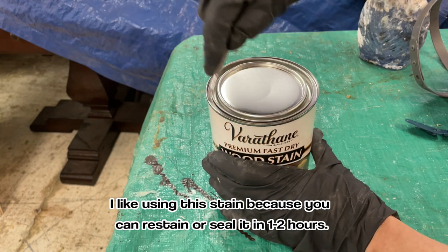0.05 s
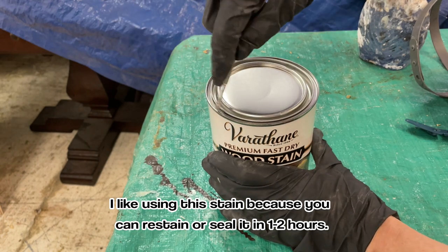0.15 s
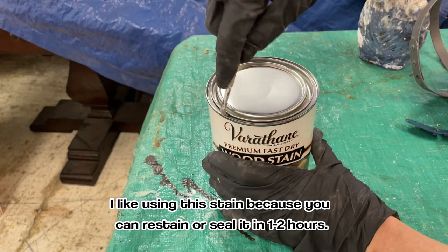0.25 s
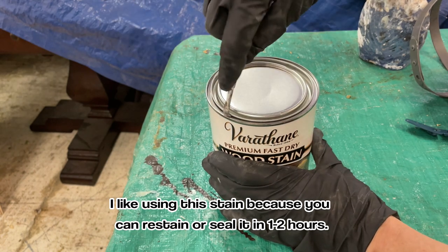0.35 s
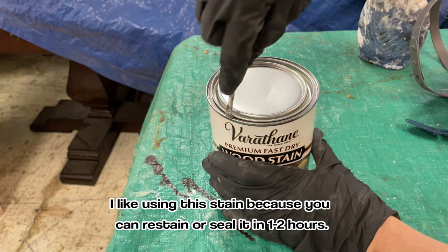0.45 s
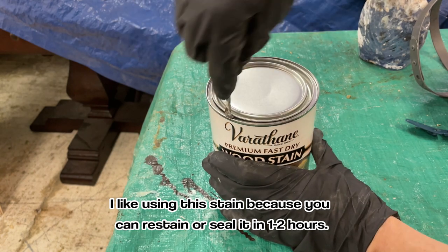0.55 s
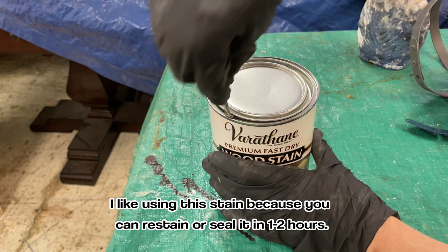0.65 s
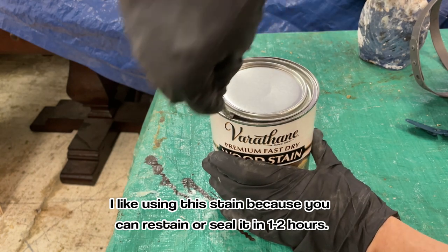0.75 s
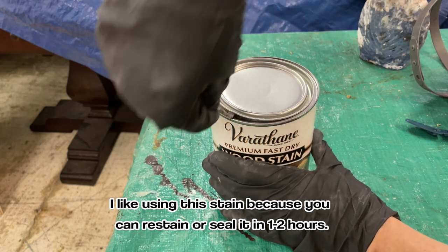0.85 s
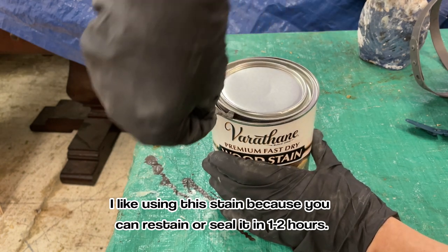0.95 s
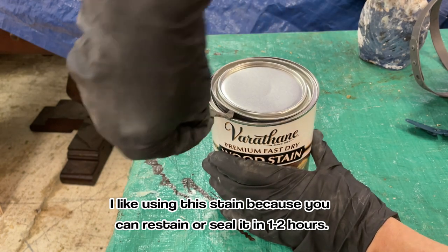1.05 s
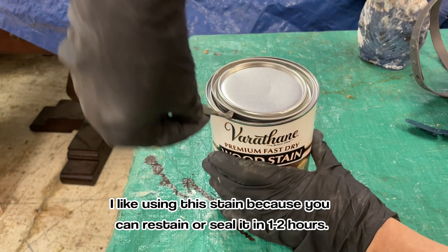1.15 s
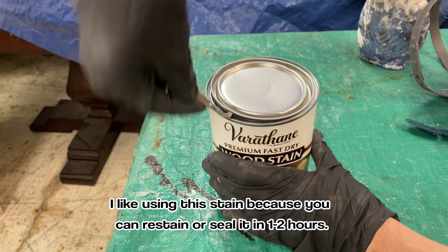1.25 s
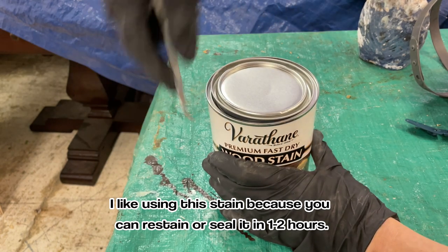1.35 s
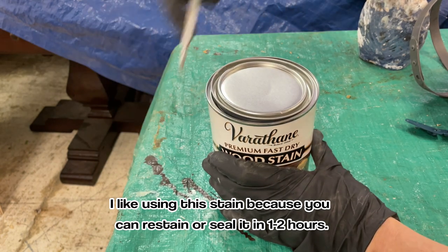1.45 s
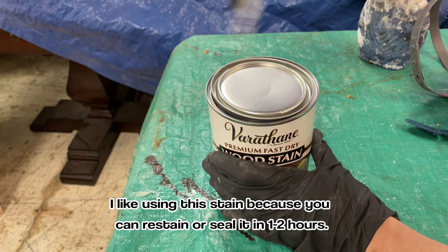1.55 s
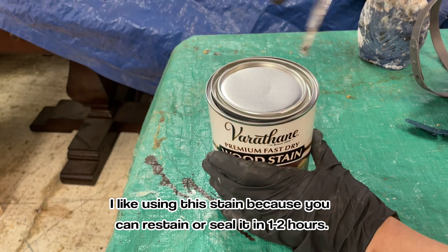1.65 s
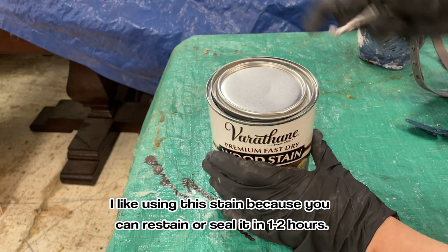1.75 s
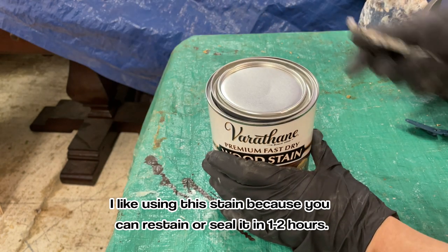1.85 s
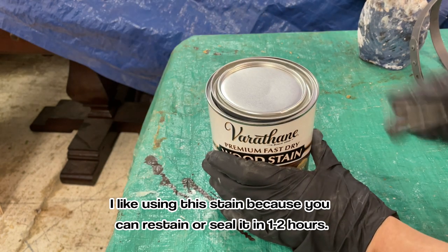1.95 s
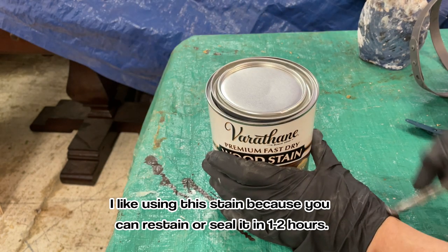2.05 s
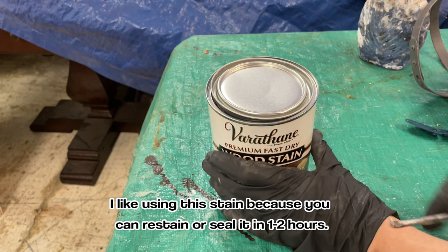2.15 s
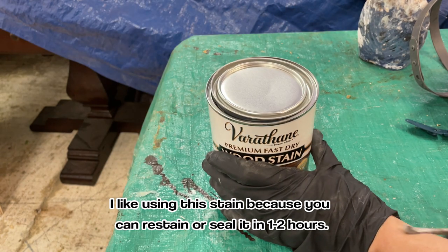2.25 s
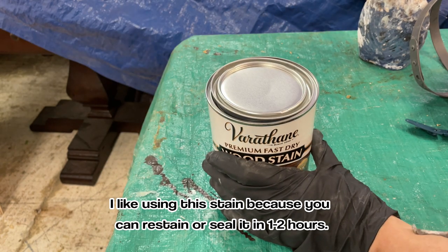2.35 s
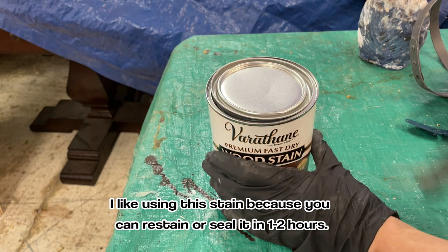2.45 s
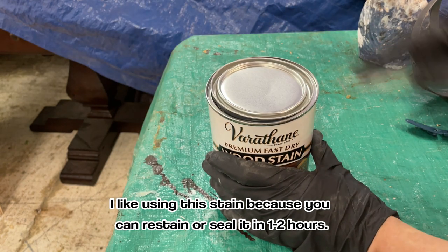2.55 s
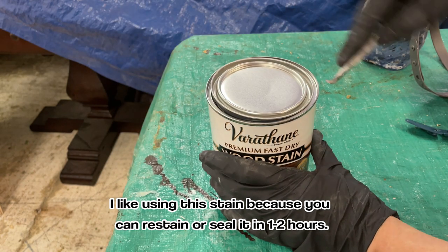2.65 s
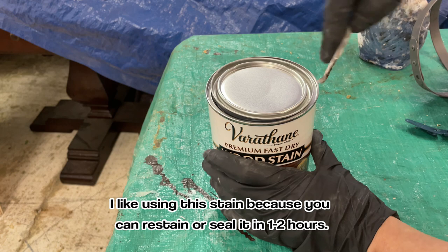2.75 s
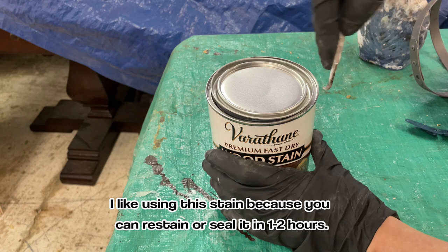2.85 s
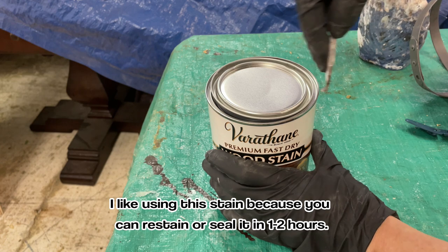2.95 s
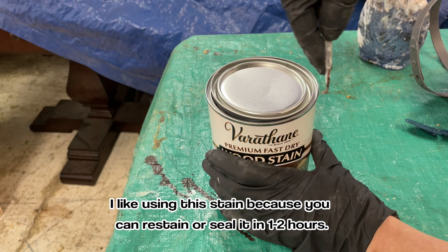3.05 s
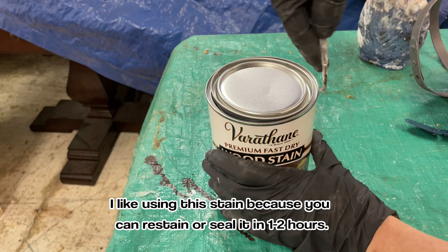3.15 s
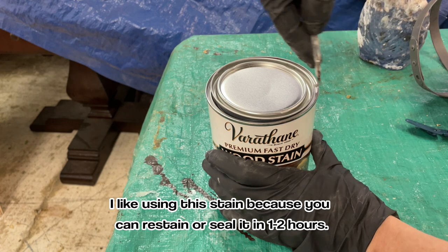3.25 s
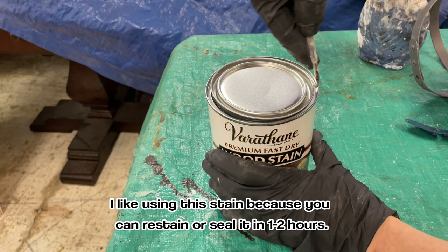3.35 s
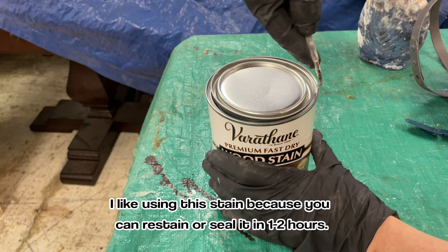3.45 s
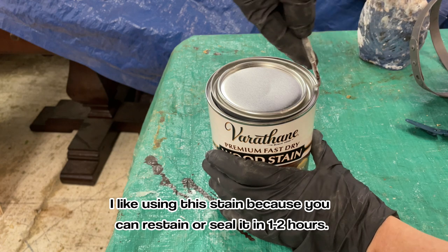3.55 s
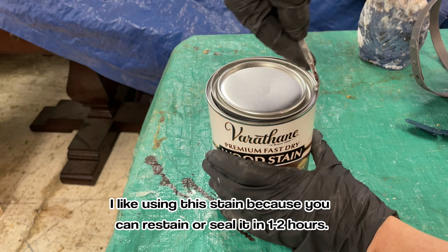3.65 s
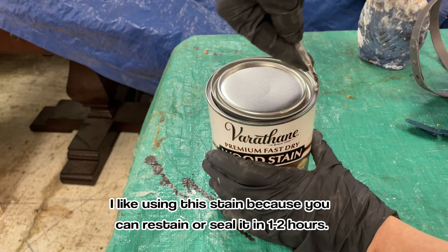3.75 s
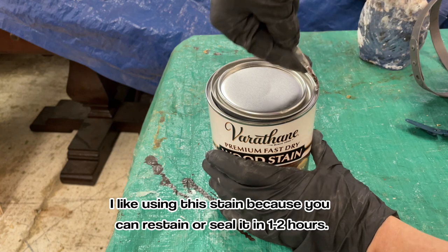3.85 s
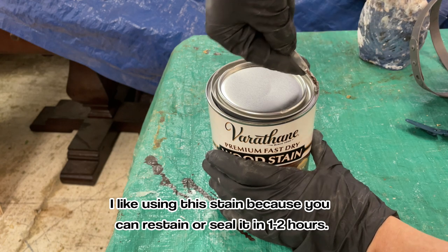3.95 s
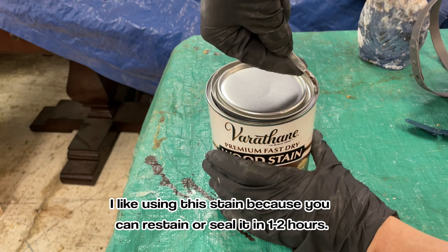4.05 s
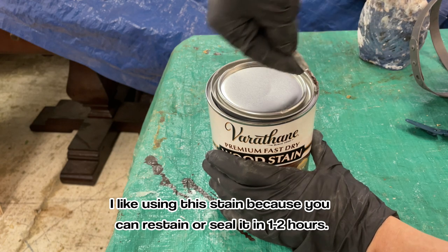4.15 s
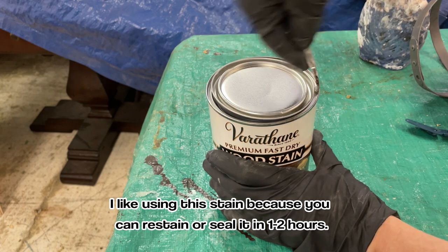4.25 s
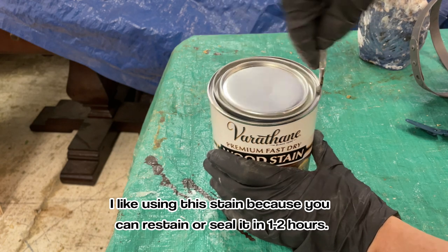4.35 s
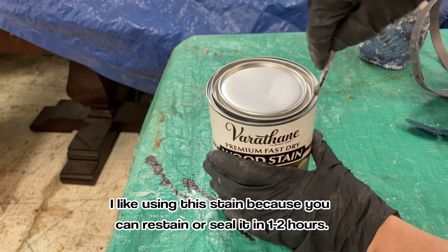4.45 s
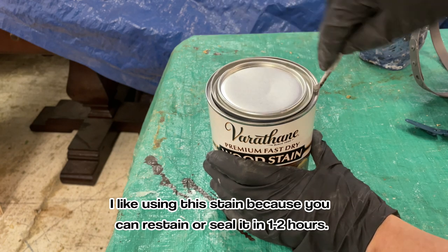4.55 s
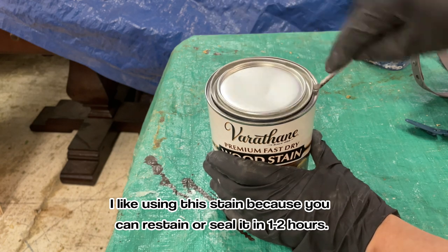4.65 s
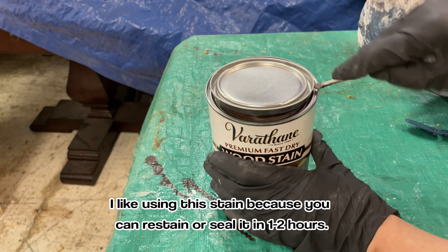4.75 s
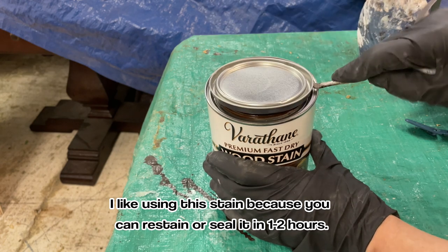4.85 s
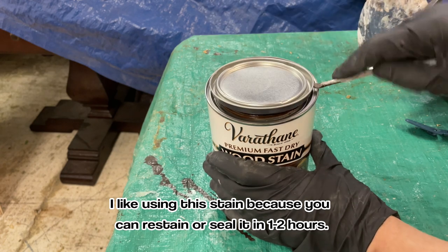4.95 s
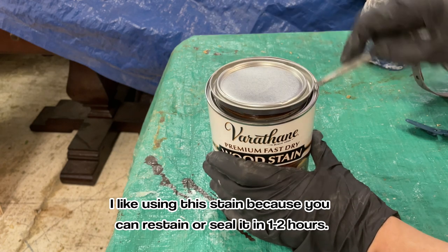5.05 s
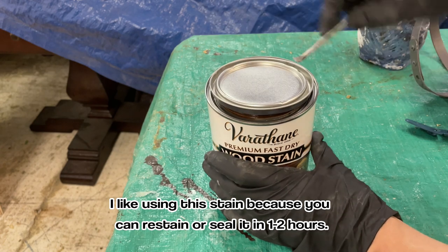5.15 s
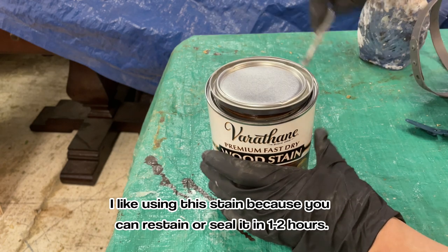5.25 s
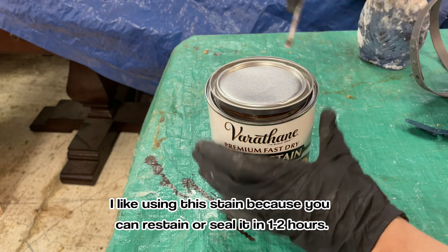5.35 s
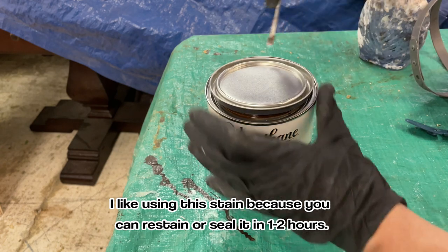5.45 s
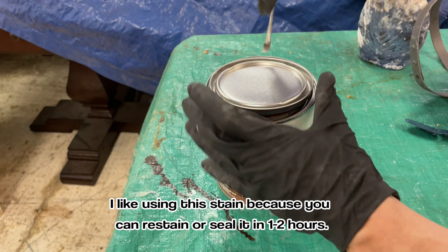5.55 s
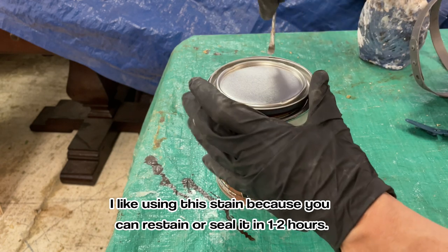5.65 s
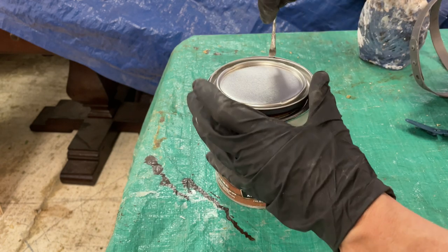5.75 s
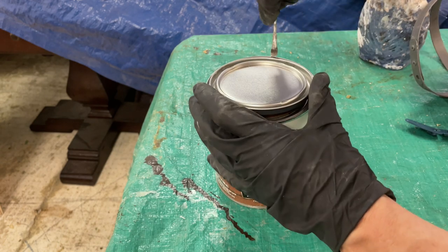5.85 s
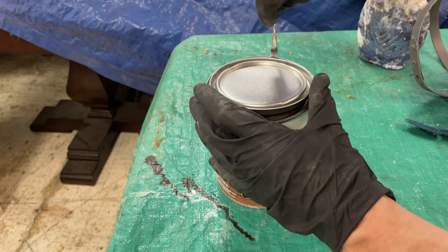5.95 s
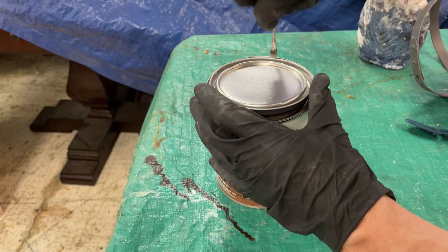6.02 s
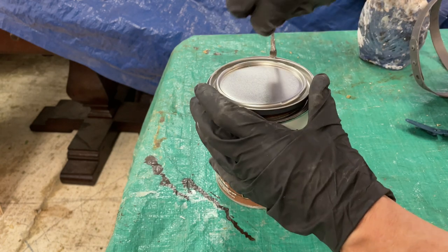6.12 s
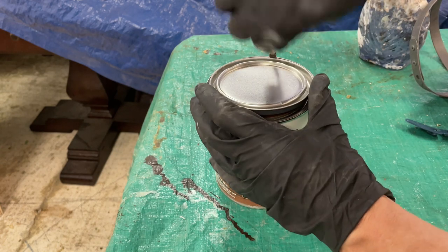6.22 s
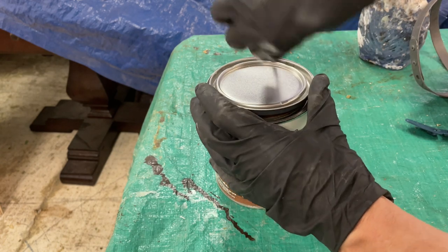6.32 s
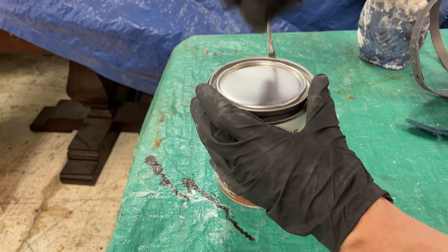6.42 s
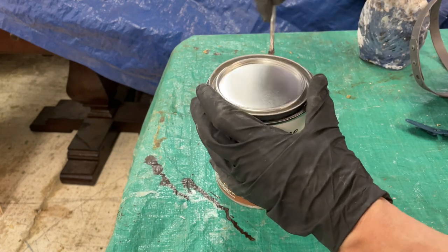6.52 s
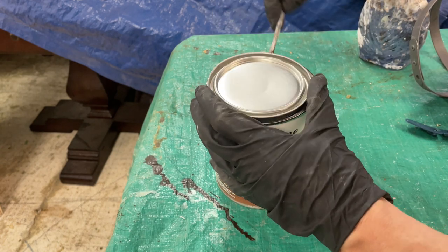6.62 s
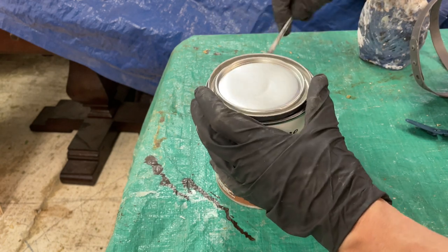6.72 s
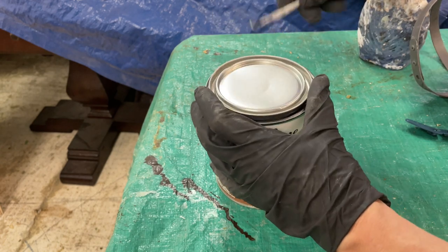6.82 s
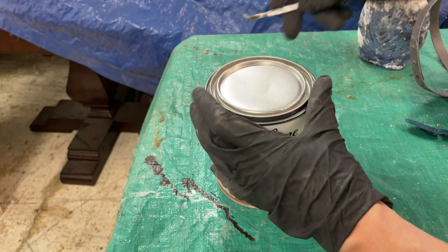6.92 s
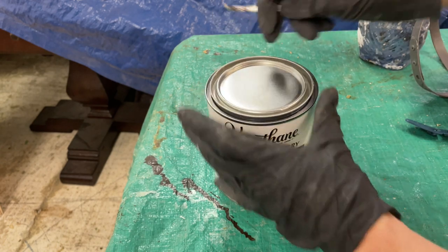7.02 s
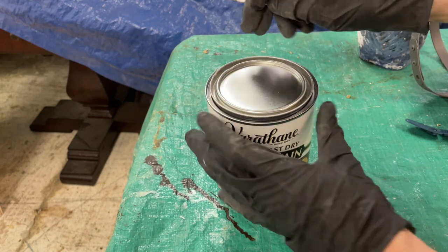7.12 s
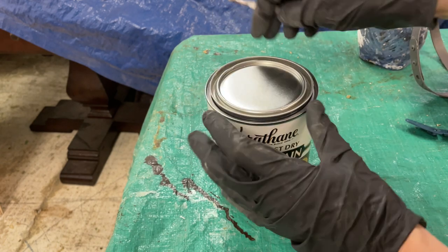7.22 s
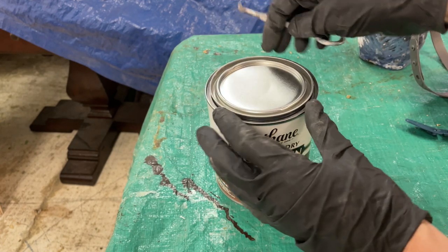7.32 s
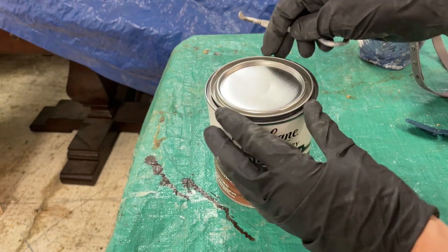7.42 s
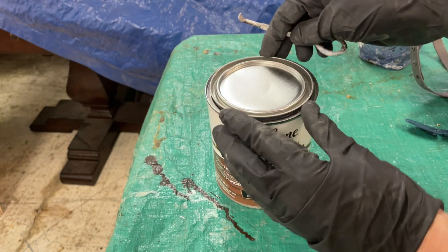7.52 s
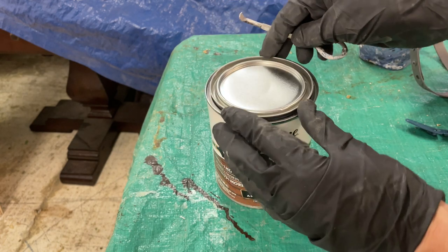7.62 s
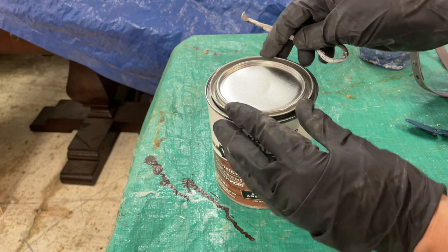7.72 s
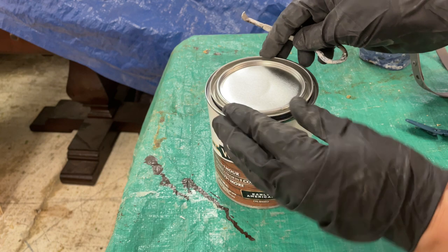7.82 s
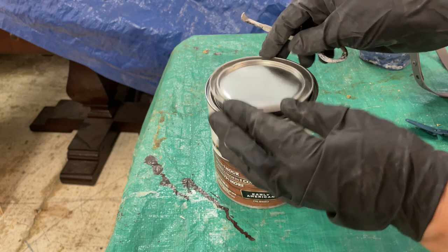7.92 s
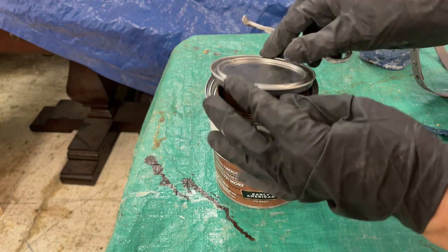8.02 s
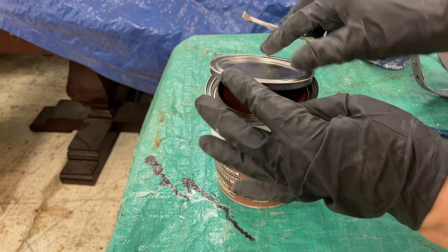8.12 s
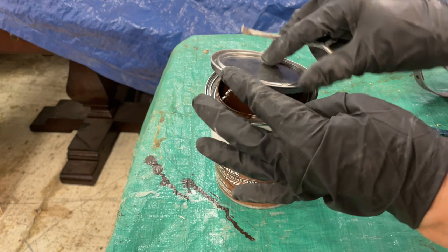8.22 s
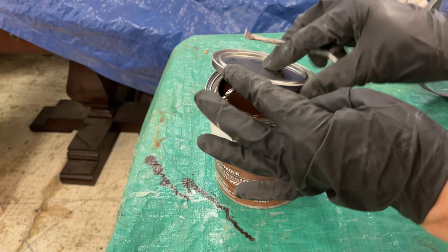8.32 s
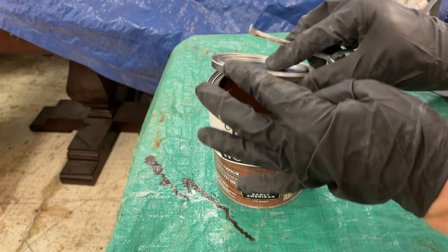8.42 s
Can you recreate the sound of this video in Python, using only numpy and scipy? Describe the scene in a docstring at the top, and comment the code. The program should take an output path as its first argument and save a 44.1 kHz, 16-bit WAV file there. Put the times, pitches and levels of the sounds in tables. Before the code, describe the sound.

A metal tool clicks and pries at a tin lid, the seal pops with a hollow boom, then looser metallic clinks over a low hum.

```python
"""In a small workshop, a screwdriver levers the lid off a tin of wood stain, close to two microphone ports.
A motor's wavering hum lines lie over filtered-noise air; gloves and sleeves rustle as swelling grainy noise.
The blade scrapes and faintly knocks as dense trains of tiny slips, and clicks as bursts of grit with short
resonances and lid modes. The seal pops with a snap, a falling puff and a boom of the can; in later clicks the
lid modes take their loose balance. Bench and walls add an echo and a short tail."""
import sys
import numpy as np
from scipy import signal
from scipy.fft import rfft, irfft, next_fast_len
from scipy.io import wavfile

SR = 44100
rng = np.random.default_rng(int(sys.argv[2]) if len(sys.argv) > 2 else 0)


def transcribe(u):
    """Save the signal u as a 16-bit wav file named by the first command-line argument.

    u: samples, shape (n,) or (channels, n), limited to [-1, 1]; the rate is SR.
    q: integer samples, one column per channel.
    """
    v = np.clip(np.atleast_2d(u).T, -1, 1)
    q = np.round(v * 32767).astype(np.int16)
    wavfile.write(sys.argv[1], SR, q)


N = 373968
TIME = np.arange(N) / SR  # time in the scene (s)
RING = np.arange(SR // 2) / SR  # time since a blow (s)
POP_S = 4.6505  # when the seal lets go (s)


def amp(db):
    """Decibels to gain."""
    return 10 ** (np.asarray(db) / 20)


def unit(x):
    """Scale to an rms of one."""
    return x / np.sqrt(np.mean(x ** 2))


def blow(x):
    """Scale a transient to the energy of a fortieth of a second at an rms of one."""
    return x / np.sqrt(np.sum(x ** 2) / (SR / 40))


def along(points, hz):
    """Read (Hz, value) points on a log-frequency axis."""
    f, value = np.transpose(points)
    return np.interp(np.log(hz + 1), np.log(f), value)


def colour(x, points):
    """Causal minimum-phase filter with the given (Hz, dB) response."""
    size = next_fast_len(len(x) + 4096) * 2
    gain = amp(along(points, np.fft.rfftfreq(size, 1 / SR)))
    # folding the cepstrum onto positive time makes the filter causal
    cepstrum = irfft(np.log(gain))
    cepstrum[1:size // 2] *= 2
    cepstrum[size // 2 + 1:] = 0
    response = np.exp(rfft(cepstrum))
    return irfft(rfft(x, size) * response)[:len(x)]


def band(x, lo_hz, hi_hz, order=2):
    """Butterworth band-pass."""
    edges = [lo_hz, min(hi_hz, SR / 2 - 1)]
    sos = signal.butter(order, edges, "band", fs=SR, output="sos")
    return signal.sosfilt(sos, x + 1e-18)


def fade(t60):
    """Exponential decay after a blow, down 60 dB at t60 seconds."""
    return np.exp(-np.log(1000) * RING / t60)


def ring(modes, scatter_db):
    """Sum of decaying (Hz, dB, t60) modes with random sign and level, since each contact weights them differently."""
    total = 0
    for hz, db, t60 in modes:
        level = amp(db + scatter_db * rng.standard_normal()) * rng.choice([-1, 1])
        total = total + level * fade(t60) * np.sin(2 * np.pi * hz * RING)
    return total


def walk(rate):
    """Random wander about zero: straight lines between normal draws, rate of them per second."""
    knots = rng.standard_normal(int(N / SR * rate) + 2)
    return np.interp(TIME * rate, np.arange(len(knots)), knots)


def grains(rate, scatter_db):
    """A dense train of tiny slips of uneven size, about rate of them per second."""
    hits = rng.random(N) < rate / SR
    sizes = rng.standard_normal(N) * amp(scatter_db * rng.standard_normal(N))
    return unit(hits * sizes)


def add(track, s, sound):
    """Mix a sound into a track at time s."""
    start = int(s * SR)
    track[start:start + len(sound)] += sound[:N - start]


# Spectrum of the workshop air. Each row: frequency in Hz, relative level in dB per Hz.
AIR = [(25, -32), (45, -7), (68, 2), (95, -4.5), (170, -8), (400, -19), (1200, -28), (2500, -34.5),
       (5000, -47.5), (8000, -53), (12000, -72), (16000, -60.5)]
# Machine hum in the workshop. Each row: frequency in Hz, level in dB, unsteadiness from 0 to 1.
HUM = [(61.6, -55, 0.9), (120.2, -51, 0.16), (257.9, -54, 0.07)]
# Room air reaching the ports from all sides. Each row: frequency in Hz, side filter gain in dB.
DIFFUSE = [(60, -16.5), (250, -9.5), (500, -3), (1000, 0), (2000, -0.5), (8000, -10)]


def workshop(air_db=-47):
    """A motor's lines waver in level and phase over the steady rush of air in the room."""
    mid, side = (amp(air_db) * unit(colour(rng.standard_normal(N), AIR)) for _ in range(2))
    for hz, db, unsteady in HUM:
        waver = 1 + unsteady * (walk(14) + 1j * walk(22))
        line = np.real(waver * np.exp(2j * np.pi * hz * TIME))
        mid = mid + amp(db) * unit(line)
    spread = colour(side, DIFFUSE) * np.array([[1], [-1]])
    return (mid + spread) * np.minimum(TIME / .005, 1)  # fades in over 5 ms


# Decay of the small room. Each row: frequency in Hz, t60 in seconds.
ROOM = [(150, 0.51), (500, 0.24), (2000, 0.23), (6000, 0.25), (13000, 0.22)]
# Colour of the reflections off bench and walls. Each row: frequency in Hz, gain in dB.
WALLS = [(100, -19.5), (400, 4), (1200, -1), (3000, -2), (6000, -7.5), (12000, -8), (15000, 3)]


def room(x, wet_db=-9, side_db=-2, build_s=0.0012, echo_db=-15, echo_s=0.019):
    """Bench and walls return one dull echo and a short dense tail that differs between the ports in the middle."""
    edges = np.geomspace(70, 16000, 9)
    tails = []
    for _ in range(2):
        noise = rng.standard_normal(len(RING))
        tail = 0
        for lo, hi in zip(edges, edges[1:]):
            tail = tail + band(noise, lo, hi) * fade(along(ROOM, np.sqrt(lo * hi)))
        build = 1 - np.exp(-(RING / build_s) ** 2)
        tail = colour(tail * build, WALLS)
        tails.append(signal.fftconvolve(x, tail / np.sqrt(np.sum(tail ** 2)))[:N])
    echo = np.interp(TIME - echo_s, TIME, band(x, 40, 900, order=1), left=0)
    side = amp(side_db) * band(tails[1], 200, 5000, order=1)
    return amp(echo_db) * echo + amp(wet_db) * (tails[0] + side * np.array([[1], [-1]]))


def stroke(s, length_s, rise_share=0.56, fall_db=12):
    """A rub swells to its peak at time s and dies away, fall_db below the peak at either end of its length."""
    before = (s - TIME) / rise_share
    after = (TIME - s) / (1 - rise_share)
    away = np.maximum(before, after) / length_s
    return amp(-fall_db * np.minimum(away, 10))


# Spectrum of glove and sleeve. Each row: frequency in Hz, relative level in dB per Hz.
CLOTH = [(600, -33), (2000, 3.5), (5200, 3), (7000, -3), (9000, -1.5), (11000, -9.5), (15500, -17)]
# Strokes of glove and sleeve near the tin.
# Each row: strongest moment in seconds, length in seconds, level in dB before the overall trim.
RUBS = [(1.42, 0.072, -51.5), (1.505, 0.034, -48), (1.676, 0.33, -54), (2.167, 0.23, -59.5),
        (2.308, 0.059, -55), (2.473, 0.22, -60), (4.947, 0.11, -60), (5.319, 0.076, -57), (6.57, 0.45, -64),
        (6.833, 0.29, -54.5), (7.175, 0.23, -59), (8.213, 1, -65.5)]


def rustle(flutter_db=2, trim_db=-2, hold_db=-73.5, brisk_db=-61):
    """Rubber gloves and sleeves rub as the hands change grip; brisk strokes hiss more brightly."""
    # a faint constant rub of gloves on the can lies under the strokes
    power = amp(hold_db) ** 2
    for s, length_s, db in RUBS:
        power = power + (amp(db) * stroke(s, length_s)) ** 2
    rubbing = np.sqrt(power)
    cloth = unit(colour(grains(rate=5000, scatter_db=0.5), CLOTH))
    # the added hiss grows with the strength of the rub, with unit gain at brisk_db
    hiss = band(colour(grains(rate=5400, scatter_db=5), CLOTH), 8000, 16000)
    hiss = hiss * rubbing / amp(brisk_db)
    return rubbing * amp(trim_db + flutter_db * walk(45)) * (cloth + hiss)


# Lid and can wall.
# Each row: mode in Hz, relative level in dB while sealed, relative level in dB once loose, t60 in seconds.
LID = [(341, 6.5, -11, 0.13), (492.3, -6, 1, 0.32), (640, -10, 4, 0.23), (855, -7.5, -2, 0.12),
       (992, 5.5, 4, 0.12), (1167, -14.5, 2.5, .2), (1696, -1.5, -2, 0.11), (1940, -5, -1.5, .11),
       (2300, -3, -4, .13), (2463, 1.5, -2, .085), (2670, 0.5, -3, .13), (2898, 4.5, -3.5, 0.067),
       (3146, 2, -6.5, 0.052), (6280, -14.5, -7, 0.1)]


def lid_modes(s):
    """The lid's modes at time s: their balance changes when the seal lets go."""
    return [(hz, sealed_db if s < POP_S else loose_db, t60) for hz, sealed_db, loose_db, t60 in LID]


# Broad response of the can, for scrapes and clicks. Each row: frequency in Hz, gain in dB.
RIM = [(130, -3.5), (780, 0.5), (1020, 6), (1200, -5.5), (1450, -9), (1800, 5), (2350, 1), (2750, -8),
       (3150, -3.5), (3550, -13), (4400, -10.5), (5000, -5.5), (7000, -3.5), (10500, -13), (15000, -24.5)]
# Drags and faint brief knocks of the blade, close to the microphone.
# Each row: strongest moment in seconds, spread in seconds, level in dB, brightness in dB relative to it,
# squeal in Hz, squeal level in dB relative to the row's level.
SCRAPES = [(.132, 0.0037, -51, -16, 1270, 2), (0.46, 0.0018, -56, -20, 1090, 5),
           (1.251, 0.0068, -50, -9.5, 2240, -1.5), (1.262, 0.0016, -48, -16, 1010, 8.5),
           (4.65, 0.0061, -41.5, -2, 1800, -6), (5.046, 0.0087, -39.5, 2, 1980, -7),
           (5.076, 0.016, -43.5, 0.5, 1000, -8), (5.097, 0.0047, -39, 1.5, 5250, -2),
           (6.473, 0.0068, -42.5, -4, 640, 5), (6.6, .0019, -47, -17, 620, 0),
           (6.694, 0.0086, -45, -0.5, 2230, -1), (6.81, .015, -51, 1, 1140, 0),
           (6.89, 0.018, -56, -10, 3200, -1), (8.18, 0.012, -56, -4.5, 730, 3)]


def scrapes(grit_db=-3, rasp_db=-2, lid_db=-4, catch_db=1.5, rattle_db=0, squeal_width=0.083, scatter_db=4):
    """Tiny slips of the blade rattle the rim and ring the lid; each drag or knock has a squeal round its own pitch."""
    slips = grains(rate=9000, scatter_db=scatter_db) * amp(catch_db * walk(400))
    force = bite = squeals = 0
    for s, spread, db, bright_db, squeal_hz, squeal_db in SCRAPES:
        press = amp(db) * np.exp(-.5 * ((TIME - s) / spread) ** 2)
        force = force + press
        bite = bite + amp(bright_db) * press
        squeal = unit(band(slips, squeal_hz / (1 + squeal_width), squeal_hz * (1 + squeal_width)))
        squeals = squeals + press * amp(squeal_db) * squeal
    rim = unit(colour(slips, RIM))
    dull = amp(rattle_db) * unit(band(rim, 500, 3450))
    rasp = amp(rasp_db) * unit(band(slips, 2700, 5850))
    grit = amp(grit_db) * unit(band(slips, 4700, 12500, order=3))
    bright = unit(unit(band(rim, 2600, 11500)) + rasp + grit)
    # the slips shake the lid's middle modes, in their loose balance throughout
    modes = band(ring(lid_modes(POP_S), scatter_db=-0.5), 650, 2800)
    lid = signal.fftconvolve(slips * force, modes / np.sqrt(np.sum(modes ** 2)))[:N]
    return force * dull + bite * bright + squeals + amp(lid_db) * lid


def slip(held_s, t60):
    """Envelope of a contact: a very quick rise, a short hold and a decay."""
    decay = np.exp(-np.log(1000) * np.maximum(RING - held_s, 0) / t60)
    return decay * (1 - np.exp(-RING / 0.000096))


def free_ring(lid, lo_hz, hi_hz, db):
    """One band of the lid ringing on after the blade has slipped."""
    return amp(db) * blow(band(lid, lo_hz, hi_hz, order=3))


# Blade slipping in the rim, close to the microphone.
# Each row: start in seconds, length of the slip in seconds, level in dB, then edge, sheen and body in dB
# relative to it, flex pitch in Hz, flex in dB, clack pitch in Hz, tick of the blade's edge in Hz,
# free ring of the lid in dB, lid mode that pings in Hz, lift of that mode in dB.
CLICKS = [(0.0886, .0022, -34.5, -22.5, -25, -3, 753, -0.5, 1970, 5220, -20, 850, 11),
          (0.1476, .0043, -43, -5.5, -5.5, -16, 458, 1, 1810, 5100, -4, 2500, 12),
          (0.2264, .0023, -36.5, -8.5, -24, -6, 1040, -9, 2030, 4350, -4, 1697, 9),
          (0.3199, .0022, -49.5, -13, -17, 0.5, 420, 0, 1910, 4120, -18, 1920, 6),
          (2.9448, .0018, -50.5, -10.5, -26, -8, 1040, -28, 2080, 3750, -9.5, 1697, 7),
          (3.131, .0018, -50, -4, -9, -11, 1000, -30, 1960, 4100, -6, 2500, 4),
          (3.3361, .0028, -40.5, -16, -48, -0.5, 760, -5.5, 1750, 4950, -3, 1697, -2),
          (3.489, .0028, -40, -23, -35, 1, 500, -4.5, 1910, 5030, -13.5, 991, 9.5),
          (3.5561, .0013, -41, -10.5, -18.5, -8.5, 1013, -10, 2190, 4600, -5.5, 2500, -3),
          (3.8674, .00097, -22, -6, -17.5, -6, 1000, -10, 2170, 6900, -2, 2898, 3),
          (5.0056, .0095, -36, -6, -13, -5.5, 1340, -4.5, 2030, 6800, 5.5, 1172, 4),
          (5.103, .001, -46.5, 3.5, 7.5, -10, 1070, -11, 2500, 5400, 7, 2660, 3),
          (5.182, .0027, -29.5, -1, -3.5, -4, 697, -8.5, 1920, 5700, 6.5, 1172, -1),
          (5.72, .0036, -35.5, -9, -24.5, 0.5, 1035, -0.5, 2430, 6250, 6, 2660, 14.5),
          (5.827, .0052, -39, -20, -29, 1.5, 1026, 6, 1840, 5070, -10, 2660, 6),
          (5.9709, .0027, -32.5, -.5, -3, -7.5, 1050, -.5, 2220, 5480, -2.5, 2300, 11),
          (6.1544, .0012, -33, 3, -2, -8, 665, -21, 1560, 5200, 0.5, 850, 0),
          (6.1577, .00068, -28.5, -2.5, -10.5, -2, 910, -4, 2350, 6680, -1.5, 1697, 5),
          (6.363, .00084, -32, -7, -11.5, -1, 972, -22, 2170, 5180, -4.5, 1697, 9.5),
          (6.479, .0014, -38, 5.5, 2, 6, 700, -2.5, 2430, 5720, -11.5, 2310, 21),
          (6.7765, .0012, -40.5, -5.5, -11, -6.5, 955, 1, 2370, 5400, 4, 2310, 1),
          (6.782, .0025, -50, -9, -22, -4, 766, 14, 2450, 5360, -14, 2310, 1),
          (6.802, .0085, -40.5, -3.5, -5, -2, 780, 6.5, 2510, 5240, -19, 2500, 12),
          (6.912, .001, -55, -3, -7, 0, 1300, 0, 2580, 5200, -9, 3150, 14)]


def clicks(crack_t60=0.016, body_t60=0.14, flex_t60=0.032, clack_t60=0.009, clack_db=-4,
           tick_t60=0.018, tick_db=-6, treble_hold=0.72, lead_db=-24, edge_ring_db=-8, sag=0.064,
           body_ring_db=-5, clatter_db=-5, clatter_t60=0.1, soft_db_per_octave=29.5):
    """Each slip of the blade cracks, flexes the pinned rim for a few cycles and leaves the lid ringing."""
    out = np.zeros(N)
    for (s, held_s, db, edge_db, sheen_db, body_db, flex_hz, flex_db,
         clack_hz, tick_hz, lid_db, ping_hz, ping_db) in CLICKS:
        grit = colour(rng.standard_normal(len(RING)), RIM)
        treble_s = held_s * treble_hold
        crack = grit * slip(treble_s, crack_t60)

        # where the blade pins the rim sets a low flex that sags as the load goes, a clack and a thin tick
        pitch = flex_hz * (1 + sag * (2 * np.exp(-RING / 0.003) - 1))
        flex = blow(slip(held_s, flex_t60) * np.sin(2 * np.pi * np.cumsum(pitch) / SR))
        clack = blow(slip(treble_s, clack_t60) * np.sin(2 * np.pi * clack_hz * RING))
        tick = blow(slip(treble_s, tick_t60) * np.sin(2 * np.pi * tick_hz * RING))

        # each point of contact favours one lid mode, which pings on
        modes = []
        for hz, mode_db, t60 in lid_modes(s):
            lift_db = ping_db * np.exp(-((hz - ping_hz) / 70) ** 2)
            modes.append((hz, mode_db + lift_db, t60))
        # the lid's many closely spaced higher modes blur into a clatter
        clatter = blow(band(grit, 1500, 9000) * fade(clatter_t60))
        lid = blow(ring(modes, scatter_db=1.5)) + amp(clatter_db) * clatter

        # less edge also ends the middle band lower
        reach_hz = max(3500 * 2 ** (edge_db / soft_db_per_octave), 1500)
        middle = blow(band(crack, 1046, reach_hz, order=4)) + amp(clack_db) * clack
        middle = blow(middle + free_ring(lid, 930, 3950, lid_db))
        # the hardness of the contact sets how the blow divides between body, edge and sheen
        body = blow(band(grit, 128, 726, order=3) * slip(held_s, body_t60))
        body = blow(body + amp(body_ring_db) * free_ring(lid, 272, 950, lid_db))
        edge = blow(band(crack, 3490, 7760, order=4)) + amp(tick_db) * tick
        edge = blow(edge + amp(edge_ring_db) * free_ring(lid, 4000, 9200, lid_db))
        sheen = blow(band(crack, 6330, 22000, order=3))
        click = middle + amp(flex_db) * flex + amp(body_db) * body
        click = click + amp(edge_db) * edge + amp(sheen_db) * sheen
        add(out, s, amp(db) * click)

        # a faint reversed decay of grit swells into each click
        swell = blow(band(grit, 760, 5430) * fade(0.03))[SR // 20::-1]
        add(out, s - len(swell) / SR, amp(db + lead_db) * swell)
    return out


# Colour of the snap as the seal parts. Each row: frequency in Hz, gain in dB.
SNAP_COLOUR = [(400, 0.0), (900, -11), (1500, 5), (2600, 4.5), (4000, -12.0), (6000, -2), (9000, -19),
               (15000, -36)]
# The can and the air in it as the seal lets go. Each row: mode in Hz, relative level in dB, t60 in seconds.
CAN = [(99.8, 0.5, 0.2), (197.5, -0.5, 0.2), (237, -17, .17), (304, 4.5, 0.15), (341, -7, .17),
       (435, -22, 0.11), (517, -18, .14), (617, -14, .07), (847, -2.5, 0.17)]


def pop(start_hz=538, end_hz=95, glide_s=0.005, swell_s=0.0043, puff_db=-8.0, can_db=-27.0,
        snap_db=-32, thud_db=-26):
    """The seal lets go: a snap, then a puff whose pitch drops as the lid springs slack, and the can booms."""
    hz = end_hz + (start_hz - end_hz) * np.exp(-RING / glide_s)
    swell = RING / swell_s * np.exp(1 - RING / swell_s)
    puff = swell * np.sin(2 * np.pi * np.cumsum(hz) / SR)
    snap = colour(rng.standard_normal(len(RING)) * fade(0.0026), SNAP_COLOUR)
    thud = band(rng.standard_normal(len(RING)) * fade(0.03), 522, 890, order=3)
    # the boom builds as the puff dies
    boom = ring(CAN, scatter_db=-2.0) * (1 - np.exp(-RING / 0.016))
    release = amp(puff_db) * puff + amp(can_db) * blow(boom)
    release = release + amp(snap_db) * blow(snap) + amp(thud_db) * blow(thud)
    out = np.zeros(N)
    add(out, POP_S, release)
    return out


def scene(pop_room_db=-3):
    """Work on the can, in the room, over the hum; the low pop stirs the room less than the other sounds do."""
    work = clicks() + scrapes() + rustle()
    release = pop()
    reflections = room(work + amp(pop_room_db) * release)
    return work + release + reflections + workshop()


# Phase between the two microphone ports. Each row: frequency in Hz, radians by which left leads.
PORT_PHASE = [(100, 0), (600, .15), (1600, -.1), (2900, .7), (4300, .8), (5400, .8), (6900, -1.3),
              (7900, -2.8), (9500, -4.4), (10800, -5.9), (12300, -6.7), (14500, -9.3)]
# Level between the two microphone ports. Each row: frequency in Hz, left minus right in dB.
PORT_BALANCE = [(60, -4.5), (110, -2), (200, -7), (380, -2.5), (1290, -2.5), (2380, 1.5), (4400, 2.5),
                (15000, 0)]


def record(dry, top_hz=16100):
    """Two close ports differ in phase and level, half the difference on each; the top is cut."""
    size = next_fast_len(N + 4096) * 2
    hz = np.fft.rfftfreq(size, 1 / SR)
    left = amp(along(PORT_BALANCE, hz) / 2) * np.exp(.5j * along(PORT_PHASE, hz))
    ports = irfft(rfft(dry, size) * np.array([left, 1 / left]))[:, :N]
    low_pass = signal.ellip(8, .2, 70, top_hz, fs=SR, output="sos")
    return signal.sosfilt(low_pass, ports)


dry = scene()
out = record(dry)
transcribe(out)
```